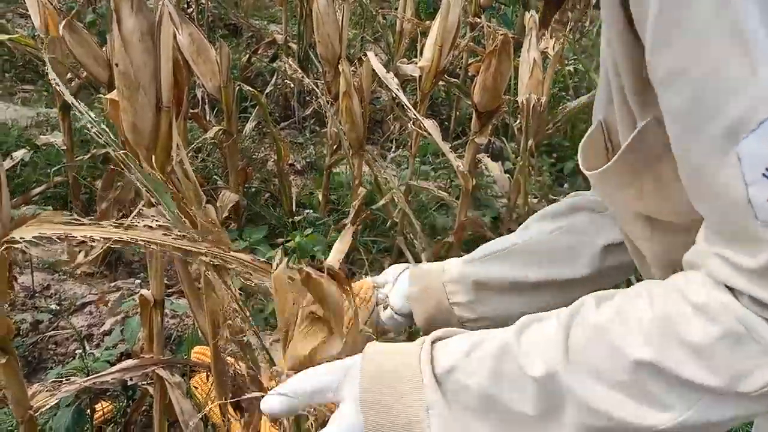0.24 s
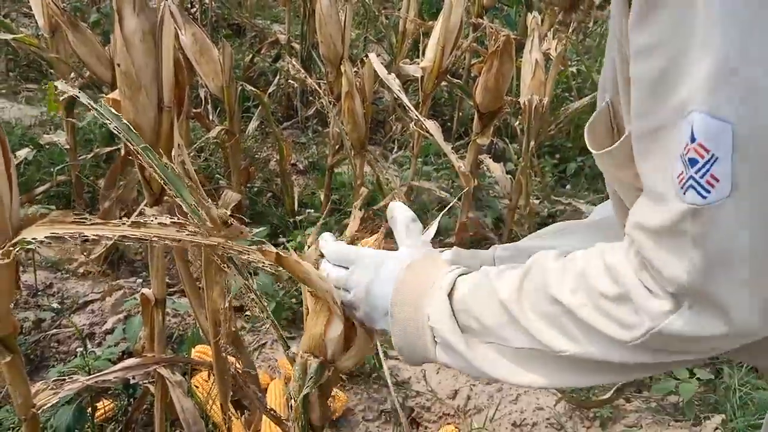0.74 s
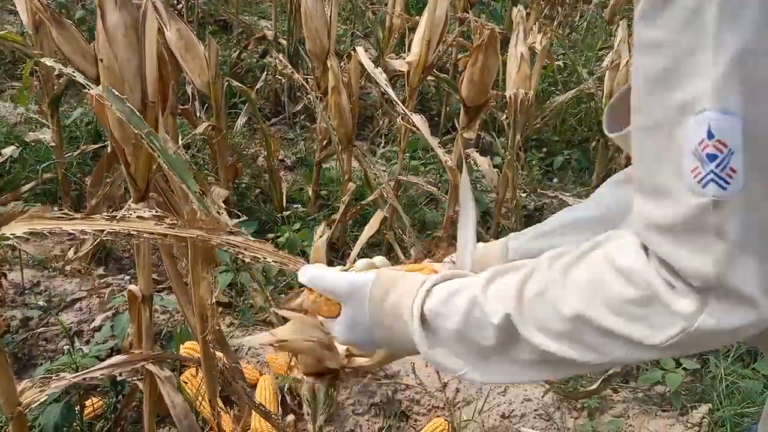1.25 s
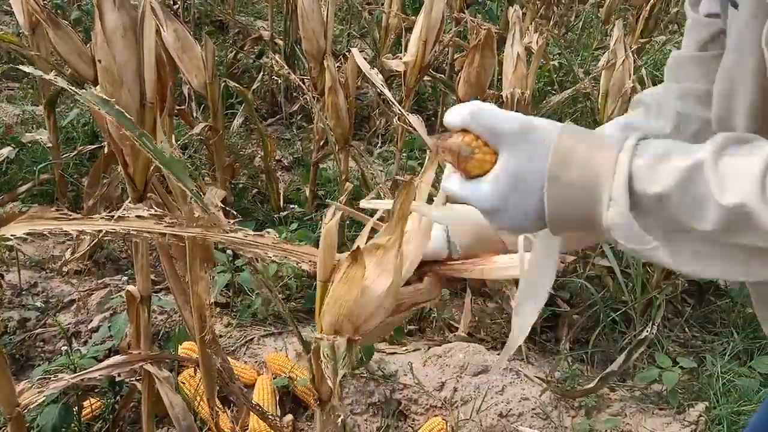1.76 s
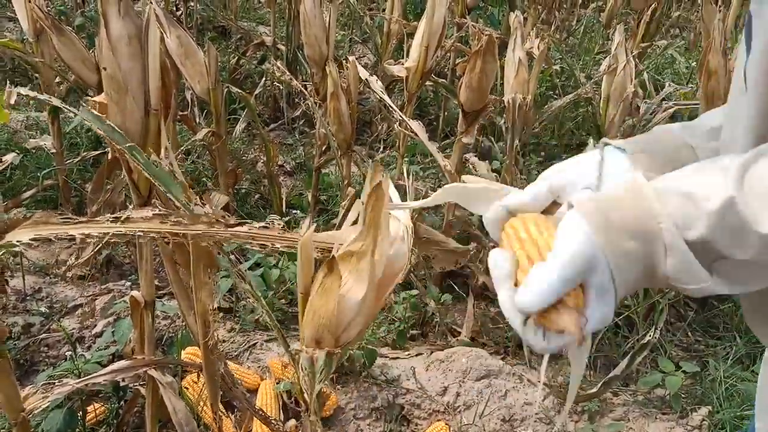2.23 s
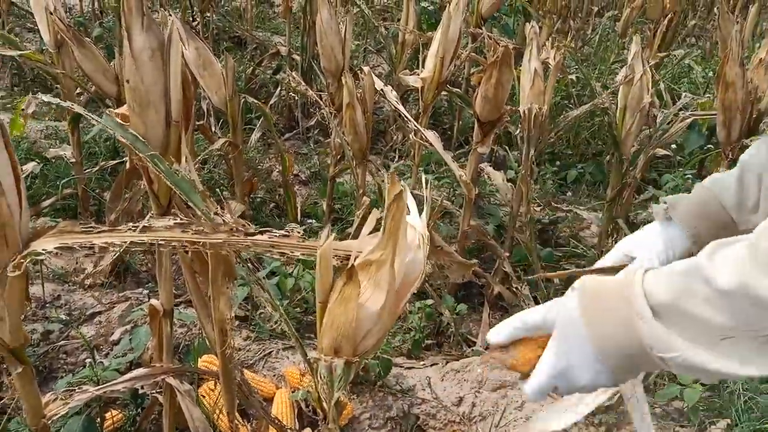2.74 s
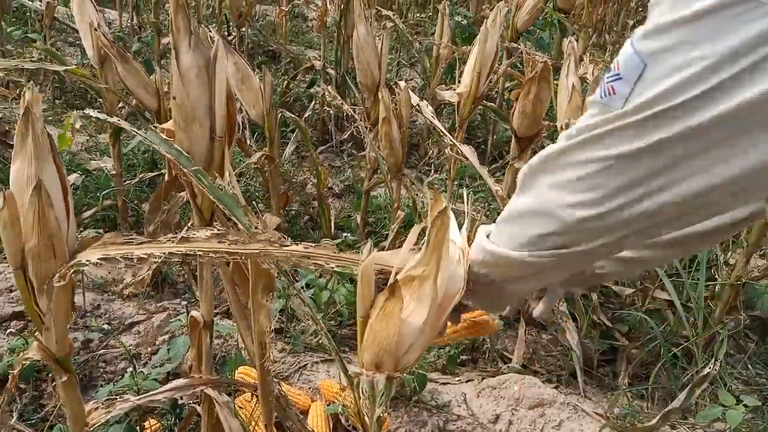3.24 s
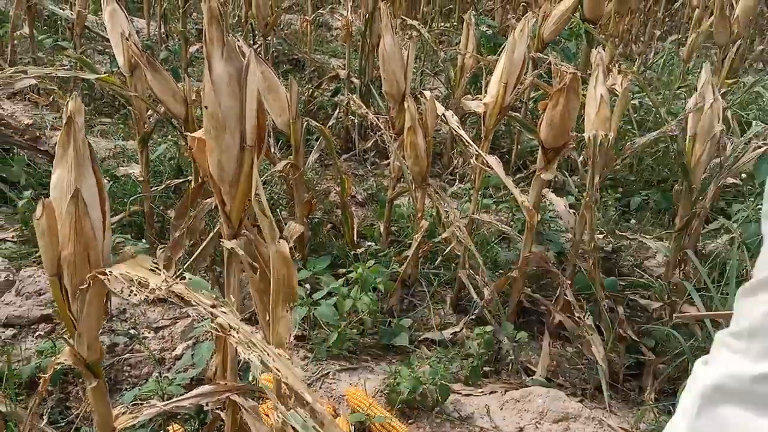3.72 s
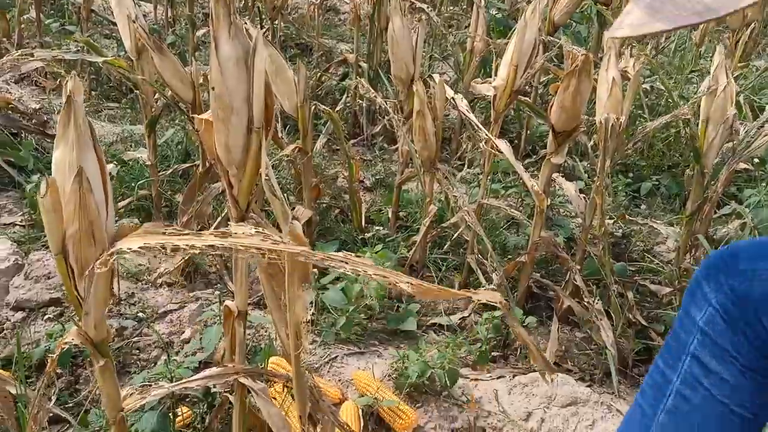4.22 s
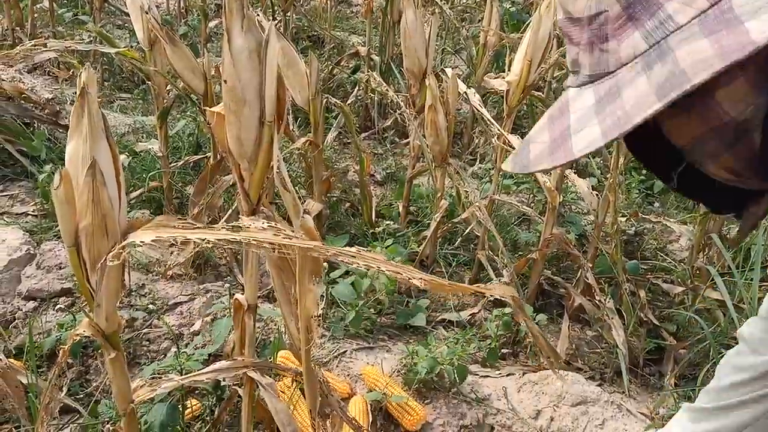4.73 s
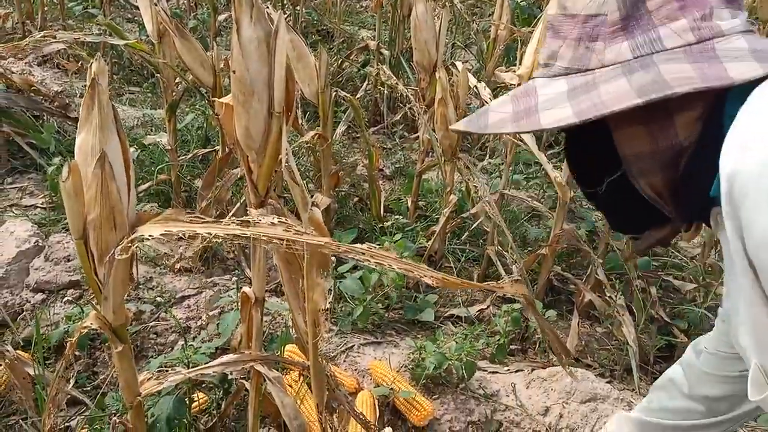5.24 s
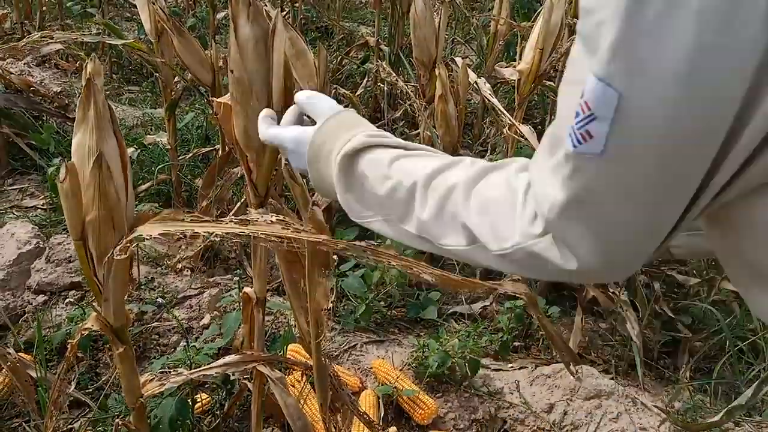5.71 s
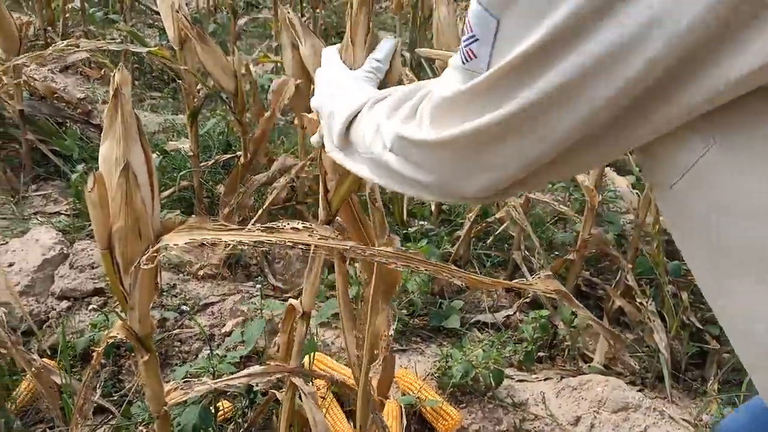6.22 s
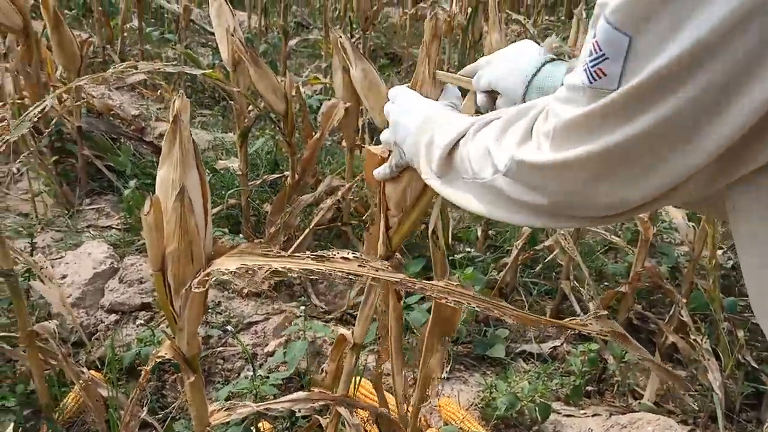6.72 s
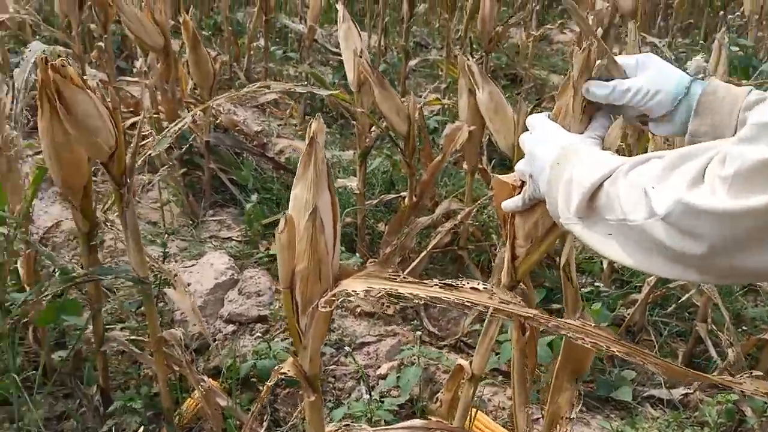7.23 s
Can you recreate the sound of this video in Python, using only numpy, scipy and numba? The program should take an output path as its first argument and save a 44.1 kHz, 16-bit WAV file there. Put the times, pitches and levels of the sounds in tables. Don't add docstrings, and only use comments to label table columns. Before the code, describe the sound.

Gloved hands tear dry corn husks at close range, crackling, crumpling and snapping in uneven bursts, with a faint distant engine and field rustle behind.

```python
import sys
import numpy as np
from scipy import signal
from scipy.fft import rfft, irfft
from scipy.io import wavfile
from scipy.ndimage import uniform_filter1d
from numba import njit

SR = 44100
rng = np.random.default_rng(int(sys.argv[2]) if len(sys.argv) > 2 else 0)


def to_linear_factor(level_db):
    exponent = np.asarray(level_db, float) / 20
    return 10 ** exponent


def generate_wav(signal):
    frames = np.transpose(np.atleast_2d(signal))
    scaled = np.clip(frames, -1, 1) * 32767
    pcm = np.round(scaled).astype(np.int16)
    wavfile.write(sys.argv[1], SR, pcm)


N = 329148

# [t/s, left minus right level/dB, left port lag/samples]
HAND_PLACE = [(0, -0.5, 2), (1, -1.5, -1), (2, -0.5, -1), (2.7, 0, -7.5), (3.5, -0.97, -7), (4.7, 1.5, -6),
              (5.2, -1, -7), (5.7, 2, -11.5), (6.2, 1.5, -9.5), (6.7, -2, -0.5), (7.46, -1, -7)]
# [t/s, level/dB]
WIND_GUSTS = [
    (0, -66),
    (1.2, -66.5),
    (2, -69.5),
    (4, -71),
    (4.5, -68.5),
    (5.5, -70),
    (6.7, -70),
    (7.46, -72.5),
]
# [f/Hz, level/dB per Hz]
FIELD_SPECTRUM = [(21, -59), (35, -41.5), (98, -9), (239, -26), (758, -19.5), (1200, -29.5), (2220, -17.5),
                  (3530, -23.5), (6360, -21), (7610, -21), (9340, -56.5), (14400, -51), (16000, -56)]
# [t/s, firing f/Hz, level/dB]
ENGINE_SPEED = [
    (0.0, 75.3, -67.5),
    (0.62, 82.2, -61.5),
    (1.52, 86.98, -64.5),
    (1.93, 87.15, -64.5),
    (2.8, 99.5, -65),
    (4.61, 99.27, -63),
    (7.29, 100.7, -66),
    (7.46, 103, -64),
]
# [multiple of firing rate, level/dB]
ENGINE_ORDERS = [
    (.5, -14),
    (1, 4),
    (1.5, -3.5),
    (2, -21.5),
]
# [t/s, peak level/dB, f/Hz, t60/s]
SOIL_THUDS = [
    (1.17, -39.5, 90, 0.0346),
    (4.393, -25.5, 228.4, 0.0345),
    (4.881, -27, 140, .03),
    (4.899, -26.5, 95, 0.038),
    (5.156, -34, 156.4, 0.0293),
    (5.172, -29, 85, 0.0385),
]
# [peak t/s, level/dB]
STALK_BRUSHES = [(.84, -57), (1.09, -56.5), (1.35, -55), (1.9, -56), (2.62, -65), (2.9, -64), (3.27, -67),
                 (3.8, -58), (4.0, -59), (4.42, -44), (4.54, -45.5), (4.77, -62), (5.04, -54),
                 (5.24, -61.5), (5.6, -63), (5.7, -57), (5.82, -56), (5.97, -54.5), (6.15, -57),
                 (6.29, -56.5), (6.43, -53), (6.53, -57), (6.93, -54.5)]
# [f/Hz, level/dB per Hz]
HUSK_SPECTRUM = [(120, -37), (200, -9.5), (366, -11), (465, -26), (709, -3.5), (1060, -4), (1270, 4.5),
                 (1910, 6), (2210, 10), (4350, -4), (6170, 0.5), (7700, -7), (9000, -20.5), (14900, -24),
                 (16000, -15)]
# [f/Hz, gain/dB]
PORT_RESPONSE = [(120, -27.5), (400, -5), (2600, 2), (4300, -1.5), (6300, 3.5), (7800, -4.5), (9200, -12.5),
                 (16000, -18)]
# [t/s, starting rms level/dB,
# length/s, centre f/Hz]
LEAF_CRUMPLES = [(0.003, -35, 0.0537, 1410), (0.048, -43, 0.17, 1188), (0.075, -48, 0.17, 3970),
                 (0.075, -32, 0.011, 2000), (0.243, -45.5, 0.1746, 3940), (0.32, -37, 0.0246, 2340),
                 (0.473, -47, 0.1794, 1406), (0.659, -38.5, 0.0121, 4710), (0.736, -48, 0.176, 4740),
                 (0.81, -42.5, 0.0128, 700), (0.811, -41.5, 0.0485, 2340), (0.902, -43.5, 0.1, 990),
                 (1.02, -37, 0.162, 1394), (1.012, -38.5, 0.0257, 5600), (1.063, -29.5, 0.025, 1980),
                 (1.104, -36, 0.049, 3960), (1.112, -36.5, 0.0126, 830), (1.227, -35, 0.181, 2360),
                 (1.284, -38, 0.0258, 697), (1.338, -26.0, 0.01233, 2820), (1.533, -39.5, 0.0129, 2350),
                 (1.583, -32, 0.0508, 3330), (1.586, -29.0, 0.0994, 1980), (1.6, -29, 0.0129, 992),
                 (1.637, -40, 0.0237, 590), (1.681, -30, 0.0116, 1980), (1.708, -39.5, 0.012, 4710),
                 (1.769, -42, 0.179, 2340), (1.865, -41, 0.1833, 1190), (1.896, -30.5, 0.0121, 1980),
                 (1.984, -40, 0.1, 2800), (2.053, -37.5, 0.012, 2350), (2.103, -44, 0.0253, 2350),
                 (2.284, -49.5, 0.0995, 1400), (2.439, -40, 0.0254, 4710), (2.716, -57, 0.051, 4200),
                 (3.543, -31.5, 0.05, 990), (3.565, -36, 0.0252, 3330), (3.623, -38.5, 0.153, 5960),
                 (3.64, -34.5, 0.1846, 2980), (3.685, -36.5, 0.1003, 1400), (3.789, -35.5, 0.025, 990),
                 (3.947, -44, 0.1816, 3320), (3.966, -48.5, 0.1806, 1174), (3.966, -41.5, 0.025, 833),
                 (4.334, -48, 0.051, 1180),
                 (4.394, -26, 0.01186, 5630), (4.397, -31.5, 0.0493, 3300), (4.397, -28, 0.01146, 990),
                 (4.433, -30.5, 0.183, 2393), (4.439, -36.5, 0.0503, 834), (4.517, -37, 0.181, 990),
                 (4.523, -24, 0.0128, 3960), (4.526, -29, 0.0114, 1980), (4.568, -36, 0.183, 2820),
                 (4.577, -32, 0.05, 4660), (4.604, -33, 0.048, 830), (4.607, -32.5, 0.0485, 2350),
                 (4.729, -50.5, 0.05, 700), (4.762, -49.0, 0.185, 1670), (4.867, -47.5, 0.0504, 4710),
                 (4.978, -44, 0.1, 705), (4.981, -40.5, 0.176, 2350), (5.035, -43, 0.047, 4710),
                 (5.056, -45.5, 0.0478, 700), (5.157, -50, 0.101, 990), (5.594, -49, 0.049, 4710),
                 (5.783, -47.5, 0.183, 5640), (5.789, -49.5, 0.181, 988), (5.953, -50.5, 0.1785, 834),
                 (6.064, -41.5, 0.1002, 2340), (6.145, -33, 0.01245, 2350), (6.181, -45, 0.05, 5600),
                 (6.301, -46, 0.05, 700), (6.393, -38, 0.0252, 1980), (6.408, -39, 0.012, 3960),
                 (6.438, -42.5, 0.181, 990), (6.477, -40, 0.1, 2350), (6.492, -36, 0.0124, 1180),
                 (6.63, -50, 0.102, 830), (6.672, -41.5, 0.0258, 2350), (6.738, -35.0, 0.025, 1400),
                 (6.798, -30, 0.0122, 588), (6.83, -32.5, 0.1, 2800), (6.813, -27.5, 0.0116, 3330),
                 (6.842, -36, 0.101, 4670), (6.857, -32.5, 0.012, 2350), (6.884, -28.5, 0.012, 1980),
                 (7.04, -55.5, 0.176, 3330), (7.256, -44.5, 0.05, 2810), (7.345, -40, 0.1003, 2350),
                 (7.42, -38, 0.026, 2350), (7.441, -38, 0.0116, 5600)]
# [t/s, peak level/dB, ring f/Hz]
VEIN_CLICKS = [(0.4218, -27, 2000), (1.0041, -22.5, 1370), (1.0365, -22, 1680), (1.062, -15.5, 2150),
               (1.0934, -19, 2220), (1.3183, -10.5, 2810), (1.3363, -16.5, 2172), (2.189, -29.5, 2830),
               (2.2732, -36.5, 1646), (2.3154, -31, 6170), (2.3591, -37.5, 1916), (2.4934, -30, 2950),
               (2.546, -39, 1760), (2.575, -43, 1610), (2.8894, -45, 1850), (3.05, -43.5, 2697),
               (3.3447, -32, 1850), (3.4959, -24, 2710), (3.6281, -22.5, 1789), (3.6468, -22, 3030),
               (4.3913, -4.5, 2290), (4.572, -16, 3020), (6.7425, -12, 2085), (6.7518, -14, 2200),
               (6.775, -14, 3030), (6.8008, -12, 2480), (6.8093, -8.5, 2220), (6.8423, -17, 2090),
               (6.8498, -16.5, 2650), (6.8584, -16, 3010), (6.8854, -18.5, 2900)]
FIRST_EAR_PULLS = [(0.0, -33, 0.1, 0.12, -10), (0.34, -45.5, 1.3, 0.03, -5), (0.477, -53, 0.14, 0.4, -8),
                   (0.608, -47.5, 1.67, 0.06, 1.17), (0.688, -51.5, -0.46, 0.6, -8.5),
                   (0.755, -46, 0.0536, 1.685, -1), (0.916, -36.5, 0.1849, 0.0457, -3),
                   (1.065, -26.5, 0.09, 0.11, -5), (1.275, -36, 0.08, 0.27, -5),
                   (1.342, -27, 0.1848, 0.0058, -7.5), (1.353, -39, 0.1131, 0.12, -2.5),
                   (1.564, -43, 0.1, 0.16, -4), (1.593, -27.9, 0.0532, 0.1476, -2.5),
                   (1.881, -33.5, 0.2156, 0.1476, -5.5), (2.06, -42, 0.5, 0.1828, -1.5),
                   (2.2, -42.5, 0.07, 0.1318, -2), (2.31, -44.5, 0.06, 0.0831, 3.5),
                   (2.49, -44, 0.29, 0.1637, -3.5), (2.938, -49.5, 0.265, 0.02, -8.5),
                   (3.005, -55, 0.0344, 0.02, 5.5), (3.155, -58.5, 0.07, 0.04, 3)]
# [peak t/s, crackle level/dB, rise/s per 20 dB, fall/s per 20 dB, fine-fibre share/dB]
LATER_PULLS = [(3.343, -41, 0.0573, 0.246, -9.5), (3.45, -34.5, 0.031, 0.16, -12.5),
               (3.552, -32.0, 0.139, 0.092, -6.5), (3.632, -32, 0.051, 0.304, -7),
               (3.767, -33.5, 0.355, 0.299, -0.65), (3.975, -41.5, 0.37, 0.216, -4.5),
               (4.263, -46.5, 0.011, 0.32, -0.5), (4.422, -34.5, 0.078, 0.4, -1.5),
               (4.548, -29.5, 0.065, 0.119, -4), (4.633, -31.5, 0.19, 0.0737, -0.97),
               (4.703, -40.5, 0.04, 0.139, -0.13), (5.067, -37.5, 0.198, 0.0304, -5.5),
               (5.165, -46.0, 0.62, 0.5, -4), (5.715, -40, 0.192, 0.294, -8.0),
               (5.775, -36.8, 0.058, 0.117, -5), (5.979, -45, 0.6, 0.235, -1.5),
               (6.258, -37, 0.375, 0.197, -6.5), (6.468, -38.5, 0.268, 0.223, -2.5),
               (6.81, -35.5, 0.072, 0.109, -7.5), (6.882, -32, 0.323, 0.072, -2.5),
               (7.0, -52.5, 0.032, 0.32, -4), (7.368, -38.5, 0.202, 0.486, -5.5)]
# [t/s, peak level/dB, ring f/Hz, tearing time/ms]
EDGE_CRACKS = [(.005, -16, 1580, 1.823), (.014, -22, 2190, 1.12), (.657, -21, 1900, 3.23),
               (.177, -27.5, 2300, 1.75), (.185, -32, 1250, 2.22), (.301, -28, 1830, 1.71),
               (.473, -34, 1590, 2.54), (1.248, -21.5, 1454, 1.127), (1.322, -14, 2540, 4.9),
               (1.576, -23, 2220, 1.42), (1.86, -21.5, 1735, 2.16), (1.881, -19, 2135, 2.7),
               (2.923, -42.5, 1410, 6.83), (2.93, -30, 2176, 2.45), (3.499, -24.5, 980, 4.9),
               (3.543, -7.5, 2440, 7.02), (4.263, -34, 944, 4), (4.842, -27.5, 3290, 1.38),
               (4.852, -36, 1497, 2.33), (5.6, -33, 1750, 1.66), (5.689, -28.5, 2650, 1.93),
               (5.938, -31, 2740, 2.21), (6.415, -32, 2088, 1.82), (7.434, -21, 1500, 1.2)]
# [t/s, peak level/dB, ring f/Hz, tearing time/ms]
TIP_CRACKS = [(.417, -27.5, 1840, 6.1), (.422, -34.5, 2740, 3.37), (.456, -34, 2170, 4.87),
              (.487, -33, 1690, 2.29), (.63, -41, 1370, 2.4), (.051, -27, 2780, 1.4),
              (1.018, -29.5, 1495, 2.87), (1.077, -16.5, 2075, 3.6), (1.196, -29, 2800, 3.78),
              (1.237, -28.5, 1340, 2.1), (1.265, -23.5, 1640, 2.41), (1.466, -31.5, 2650, 3.58),
              (1.512, -33, 1730, 3.57), (1.68, -16.5, 5690, 3.47), (2.411, -39.5, 2290, 0.92),
              (2.425, -37, 6040, 1.37), (2.441, -27.5, 2930, 0.89), (2.774, -43.5, 2320, 4.1),
              (2.84, -37, 2250, 4.68), (2.981, -42.5, 6330, 4.8), (4.272, -27, 1770, 1.88),
              (4.716, -23, 2790, 1.413), (5.912, -32.5, 6100, 2.7), (6.739, -21, 2940, 2.8),
              (7.179, -38, 1870, 2.54), (7.258, -36.5, 1820, 2.88)]
# [t/s, peak level/dB, ring f/Hz, tearing time/ms]
RIB_CRACKS = [(.074, -26, 891, 3.39), (.106, -28, 900, 2.12), (.321, -31, 790, 6.77), (.52, -40, 683, 8),
              (.836, -26.5, 2134, 4.63), (1.329, -11, 2380, 2.5), (1.593, -15.5, 2840, 7.6),
              (1.895, -17.5, 2160, 3.35), (1.898, -20, 1306, 3.185), (3.540, -13.5, 1794, 7.9),
              (4.557, -20, 2600, 3.6), (5.574, -36.5, 2630, 2.34), (5.961, -25.5, 2452, 3.7),
              (6.145, -18, 5900, 1.11), (6.211, -24.5, 2510, 4.23), (6.288, -31, 3500, 1.6),
              (6.425, -14, 1706, 1.398), (6.49, -25.5, 1750, 3.02), (6.516, -36, 1720, 1.98),
              (6.538, -29, 2480, 1.81), (6.722, -29.5, 2060, 1.7), (6.765, -17.5, 2370, 1.505),
              (6.938, -22, 2420, 3.6), (7.35, -32.5, 740, 5.9), (7.394, -22.5, 1455, 1.486)]
# [t/s, peak level/dB, ring f/Hz, tearing time/ms]
LEAF_CRACKS = [(.584, -26.5, 1740, 3.01), (1.615, -13.5, 5940, 1.66), (1.625, -15.5, 3400, 1.6),
               (2.097, -33.5, 2840, 0.896), (2.466, -31.5, 2260, 1.77), (2.486, -32.5, 2090, 2.45),
               (3.094, -43.5, 4285, 2.25), (3.828, -31, 1290, 2.17), (3.857, -26, 1113, 3.75),
               (4.26, -23, 2770, 2.3), (4.372, -33, 1310, 1.68), (4.392, -6, 2377, 3.52),
               (4.512, -15, 2710, 8), (4.613, -12.5, 3132, 5.14), (5.02, -29, 757, 8.88),
               (5.698, -30, 815, 0.79), (6.599, -30, 2800, 4.44), (6.778, -17, 2960, 2.85),
               (6.803, -14, 2570, 3.5), (6.81, -20, 606, 1.68), (6.871, -19, 6130, 2.26),
               (6.876, -18, 2304, 2.12), (7.215, -35.5, 1470, 5.67)]
# [broad-face share/dB, fibre share/dB]
CRACK_KINDS = [
    (-26, -10),
    (-29, 2),
    (-11, -10.5),
    (-9, 1),
]


def butter(x, order, hz, kind):
    return signal.sosfilt(signal.butter(order, hz, kind, fs=SR, output="sos"), x)


def colour(x, points):
    hz, db = np.transpose(points)
    grid_hz = np.linspace(1, SR / 2, 2049)
    log_gain = np.log(to_linear_factor(np.interp(np.log(grid_hz), np.log(hz), db)))
    cepstrum = irfft(log_gain)
    cepstrum[1:2048] *= 2
    cepstrum[2049:] = 0
    impulse = irfft(np.exp(rfft(cepstrum)))[None, :2048]
    return signal.fftconvolve(x, impulse, axes=1)[:, :N]


def level(x, db):
    return x * to_linear_factor(db) / np.sqrt(np.mean(x ** 2))


def curve(table):
    s, *columns = np.transpose(table)
    return [np.interp(np.arange(N) / SR, s, c) for c in columns]


def walk(rate_hz):
    hold = int(SR / rate_hz)
    steps = np.repeat(rng.standard_normal(N // hold + 1), hold)
    return 0.874 * uniform_filter1d(uniform_filter1d(steps, hold), hold)[:N]


def spurts(rate_hz, spread_db, fade_s):
    u = rng.random((int(rate_hz * N / SR), 2)).T
    kicks = np.bincount((u[0] * N).astype(int), to_linear_factor(-spread_db * np.log(u[1] + 0.055)), N)
    return 1.914 + signal.lfilter([1], [1, -np.exp(-1 / (fade_s * SR))], kicks)


def swells(rows):
    s, db, rise_s, fall_s = np.transpose(rows)[:4, :, None]
    t = np.arange(0, N / SR, 1 / 1000)
    return t, to_linear_factor(db - 20 * np.maximum((s - t) / rise_s, (t - s) / fall_s)) ** 2


@njit
def ring(at, hz, t60, size, rise):
    out = np.zeros(N)
    for k in range(len(at)):
        s = (2j * np.pi * hz[k] - np.log(1000) / t60[k]) / SR
        i = int(np.ceil(at[k]))
        z, p = size[k] * np.exp(s * (i - at[k])), np.exp(s)
        q = np.exp(-hz[k] / (rise * SR))
        lack = q ** (i - at[k])
        for j in range(max(i, 0), min(i + int(t60[k] * SR), N)):
            out[j] += z.imag * (1 - lack)
            z *= p
            lack *= q
    return out


def ports(at, hz, t60, size, pan_db, stray, rise=0.25):
    lag = np.interp(at / SR, *np.transpose(HAND_PLACE)[[0, 2]]) + stray
    return np.array([ring(at + side * lag, hz, t60, size * to_linear_factor(side * pan_db), rise) for side in (.5, -.5)])


def wind():
    x = butter(rng.standard_normal((2, N)), 2, (45, 170), "bandpass")
    puffs_db = 4.95 * np.array([walk(16), walk(9.6)])
    return level(x * to_linear_factor(puffs_db), 0) * to_linear_factor(curve(WIND_GUSTS)[0] + np.array([[-3.5], [3.5]]))


def field():
    mid, side = rng.standard_normal((2, N))
    side = butter(side, 1, 900, "highpass") + 0.31 * side
    x = (mid + side * np.array([[.7], [-.7]])) * to_linear_factor(np.array([[-1.5], [1.5]]))
    return level(colour(x, FIELD_SPECTRUM), -61.5) * to_linear_factor(3.1 * walk(3.6))


def engine():
    hz, db = curve(ENGINE_SPEED)
    phase = 2 * np.pi * np.cumsum(hz * (1 + 0.02976 * walk(34))) / SR
    shift = np.array([[.45], [-.45]]) * (1 + 0.3 * walk(20))
    hum = 0
    for order, order_db in ENGINE_ORDERS:
        hum = hum + to_linear_factor(order_db + 3.62 * walk(38)) * np.sin(order * phase + shift)
    return hum * to_linear_factor(db + np.array([[.8], [4.5]]))


def thuds():
    s, db, hz, t60 = np.transpose(SOIL_THUDS)
    blow = butter(ring(s * SR, hz, t60, to_linear_factor(db + 4.5), 0.152), 2, (55, 340), "bandpass")
    return blow * to_linear_factor(np.array([[-5], [3]]))


def brushing():
    rise_s, fall_s = 0.1015, 0.1517
    t, power = swells([(*row, rise_s, fall_s) for row in STALK_BRUSHES])
    return curve(np.transpose([t, np.sqrt(power.sum(axis=0))]))[0]


def stalks(count, turns):
    u, g = rng.random((count, 2)).T, rng.standard_normal((count, 2)).T
    hz = 330 * 2 ** (0.373 * g[0])
    size = to_linear_factor(-2.5 * np.log(u[1] + 0.0105))
    x = ports(u[0] * N, hz, turns / hz, size, 2 * g[1], 3 * g[1])
    return level(butter(x, 2, (220, 480), "bandpass"), 0.53) * brushing()


def crumples(count, spread_db, turns):
    fade_db, spread_octaves = 12, 0.381
    s, db, length_s, centre_hz = np.transpose(LEAF_CRUMPLES)[:, :, None]
    u, g = rng.random((len(s), count, 2)), rng.standard_normal((len(s), count, 3))
    hz = np.clip(centre_hz * 2 ** (spread_octaves * g[..., 0]), 200, 15000)
    t60 = turns / hz
    uneven = to_linear_factor(-spread_db * np.log(u[..., 1] + 0.0234))
    uneven = uneven / np.sqrt(np.mean(uneven ** 2, axis=1, keepdims=True))
    snap = np.sqrt(4 * np.log(1000) * length_s / (count * t60))
    size = to_linear_factor(db + 1.71 - fade_db * u[..., 0]) * uneven * snap
    at = SR * (s + length_s * u[..., 0])
    pan_db = np.interp(s, *np.transpose(HAND_PLACE)[:2]) + 3 * g[..., 1]
    flat = [np.ravel(v) for v in (at, hz, t60, size, pan_db, 3.06 * g[..., 2])]
    return colour(ports(*flat, rise=0.228), PORT_RESPONSE)


def cracks(tables, kinds, count, turns):
    rows = [(*row, *kind) for table, kind in zip(tables, kinds) for row in table]
    s, db, ring_hz, tear_ms, face_db, fibre_db = np.transpose(rows)[:, :, None]
    u, g = rng.random((len(s), count, 3)), rng.standard_normal((len(s), count, 4))
    index = np.arange(count)
    part, turn = index % 4, index // 4
    after = 2.8 * ((turn + u[..., 0]) / (count / 4)) ** 1.3 * (index > 3)
    span = (u[:, :1, 2] + turn * (np.sqrt(5) - 1) / 2) % 1 - .5
    octaves = np.choose(part, [0.45, 0.996, 2.264, 1.675])
    hz = np.choose(part, [ring_hz, 640 + 0 * s, 7200 + 0 * s, 1900 + 0 * s]) * 2 ** (octaves * span)
    share_db = np.choose(part, [0 * s, face_db, fibre_db - 0.5, 0 * s - 3.5])
    size = to_linear_factor(db + share_db - 4.44 * after + 0.9 * g[..., 2] + 3.5) * np.sign(u[..., 1] - .5)
    at = SR * (s + after * np.clip(tear_ms, .4, 12) / 1000)
    t60 = turns * np.choose(part, [1.38, 0.723, 2.144, 0.676]) / hz
    pan_db = np.interp(s, *np.transpose(HAND_PLACE)[:2]) + 5.53 * g[..., 3]
    stray = (1.44 + 1.395 * after) * g[..., 1]
    flat = [np.ravel(v) for v in (at, hz, t60, size, pan_db, stray)]
    return colour(ports(*flat, rise=0.2424), PORT_RESPONSE)


def veins():
    tear_ms, face_db, fibre_db = 0.598, -23.5, -5
    rows = [(*row, tear_ms) for row in VEIN_CLICKS]
    return to_linear_factor(-3.5) * cracks([rows], [(face_db, fibre_db)], count=8, turns=4.33)


def hands():
    rest_db, rest_fibre_db = -72.5, -3
    first_leaf_db, later_leaf_db, leaf_per_db = -14, -12, 0.3082
    pulls = FIRST_EAR_PULLS + LATER_PULLS
    t, power = swells(pulls)
    power = power * to_linear_factor(-3) ** 2
    total = power.sum(axis=0) + to_linear_factor(rest_db) ** 2
    fibre_db = (np.array(pulls)[:, 4] @ power + rest_fibre_db * to_linear_factor(rest_db) ** 2) / total
    grip_db = 10 * np.log10(total)
    shares_db = np.repeat((first_leaf_db, later_leaf_db), [len(FIRST_EAR_PULLS), len(LATER_PULLS)])
    leaf_db = shares_db @ power / power.sum(axis=0) + leaf_per_db * (grip_db + 45)
    return curve(np.transpose([t, grip_db, leaf_db, fibre_db]))


def crackle(count, spread_db, turns):
    u, g = rng.random((count, 3)).T, rng.standard_normal((count, 3)).T
    at, hz = u[0] * N, 400 + 15000 * u[1] ** 2
    sample = at.astype(int)
    size_class = np.digitize(hz * 1.08 ** g[2], (900, 1500, 2300, 3600, 5500))
    own = np.array([spurts(30, 2.03, 0.0084) for _ in range(6)])[size_class, sample]
    shared = spurts(90, 1.2, 0.0087)[sample] ** 0.42
    size = hz ** 0.818 * to_linear_factor(-spread_db * np.log(u[2] + 0.00098)) * own * shared
    x = colour(ports(at, hz, turns / hz, size, 3 * g[0], 3.04 * g[1]), HUSK_SPECTRUM)
    low = level(butter(x, 3, 900, "lowpass"), 0.76)
    mid = level(butter(x, 3, (900, 3600), "bandpass"), 0)
    high = level(butter(x, 3, 3600, "highpass"), -0.59)
    grip_db, leaf_db, fibre_db = hands()
    mix = to_linear_factor(leaf_db) * low + mid + to_linear_factor(fibre_db) * high
    return mix * to_linear_factor(grip_db + np.outer([.5, -.5], curve(HAND_PLACE)[0]) + 3.0)


def scene():
    around = wind() + field() + engine() + thuds() + stalks(count=1400, turns=20.7)
    leaves = crumples(count=64, spread_db=3.0, turns=8.9) + veins()
    crack_tables = (EDGE_CRACKS, TIP_CRACKS, RIB_CRACKS, LEAF_CRACKS)
    stiff = cracks(crack_tables, CRACK_KINDS, count=32, turns=5.85)
    return around + leaves + stiff + crackle(count=50000, spread_db=1.4, turns=9.13)


def top_cut(x):
    return signal.sosfilt(signal.butter(12, 16420, fs=SR, output="sos"), x)


def record(dry):
    soft = np.tanh(1.0276 * dry) / 1.175
    soft = butter(soft, 2, 35, "highpass")
    soft = signal.sosfilt(signal.ellip(8, .2, 60, 15700, fs=SR, output="sos"), soft)
    return top_cut(soft)


dry = scene()
out = record(dry)
generate_wav(out)
```